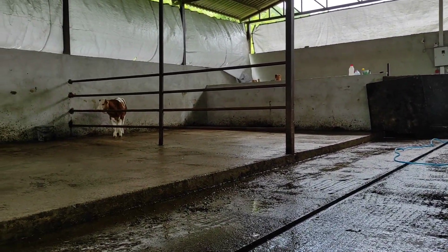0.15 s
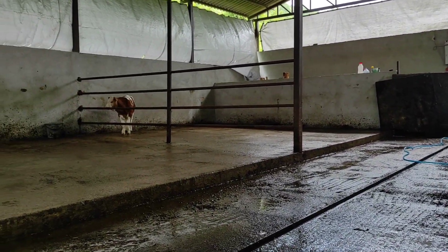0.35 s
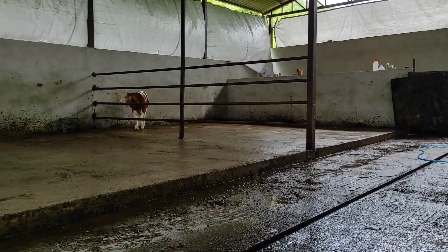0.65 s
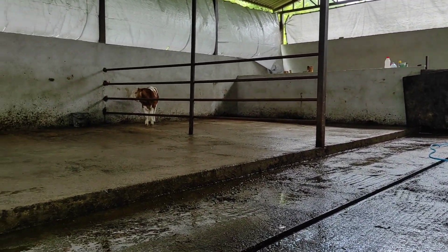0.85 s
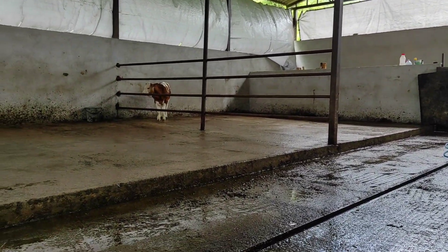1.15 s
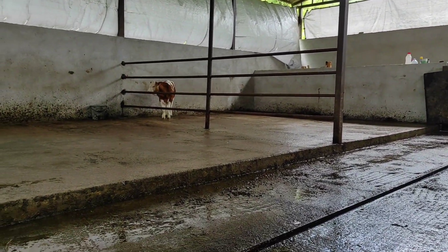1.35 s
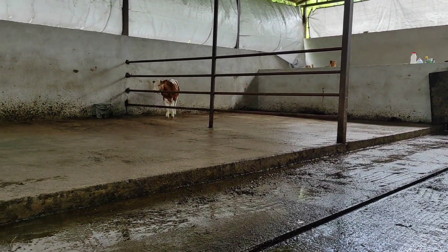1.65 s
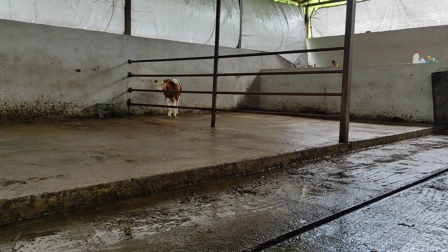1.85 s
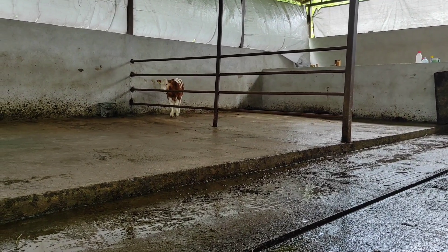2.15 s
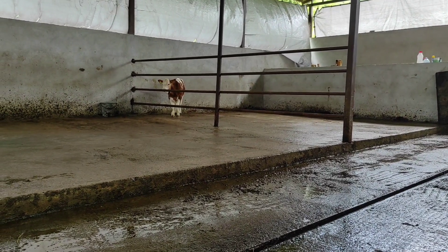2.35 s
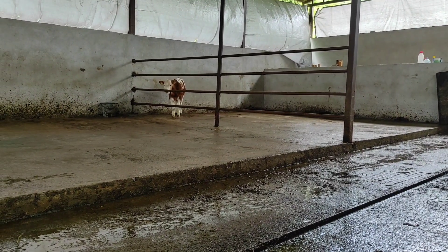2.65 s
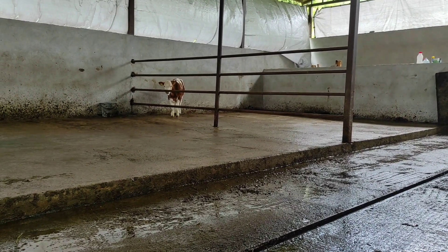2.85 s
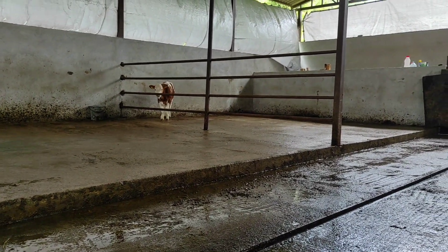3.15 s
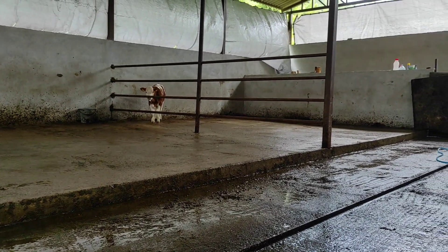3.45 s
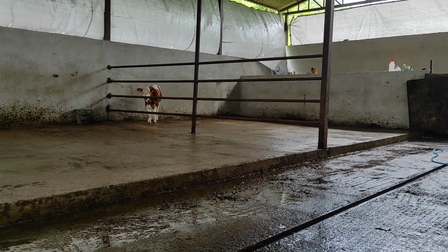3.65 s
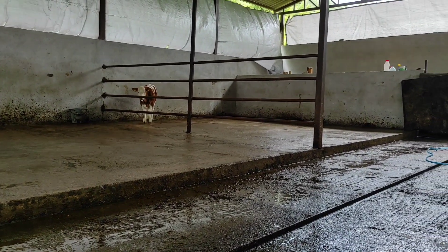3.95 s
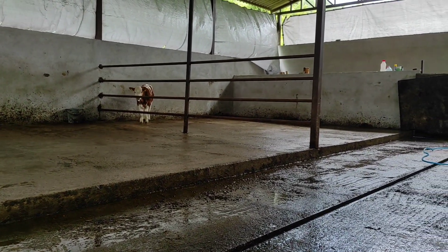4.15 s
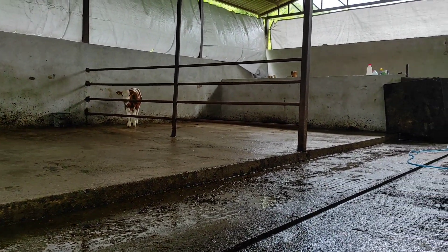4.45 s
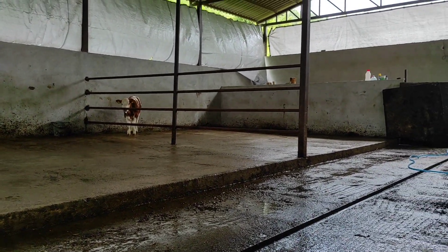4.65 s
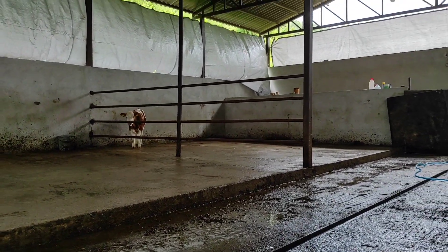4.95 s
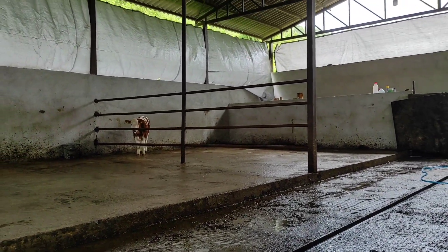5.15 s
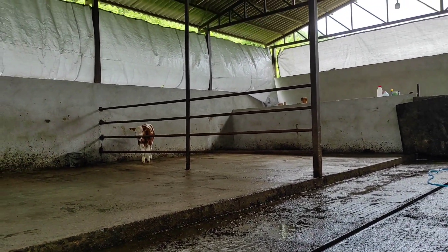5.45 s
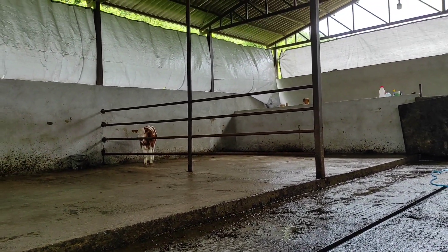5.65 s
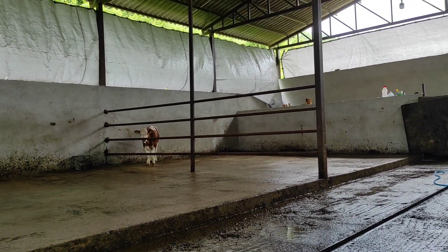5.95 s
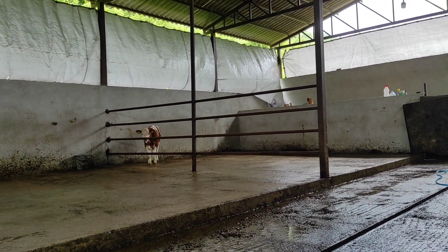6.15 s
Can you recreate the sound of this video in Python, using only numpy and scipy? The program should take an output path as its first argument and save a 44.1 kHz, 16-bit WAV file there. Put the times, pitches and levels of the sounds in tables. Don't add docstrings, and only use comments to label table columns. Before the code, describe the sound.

A steel scraper is pushed in gritty, rasping strokes over wet concrete in an echoing barn, with knocks and a steady hose hiss.

```python
import sys
import numpy as np
from scipy import signal
from scipy.fft import rfft, irfft, next_fast_len
from scipy.io import wavfile
from scipy.ndimage import uniform_filter1d

SR = 44100
rng = np.random.default_rng(int(sys.argv[2]) if len(sys.argv) > 2 else 0)


def unload_audio(sound):
    columns = np.transpose(np.atleast_2d(sound))
    steps = np.round(np.clip(columns, -1, 1) * 32767)
    wavfile.write(sys.argv[1], SR, steps.astype(np.int16))


def gain_from_db(level_db):
    decades = np.asarray(level_db, float) / 20
    return 10 ** decades


N = 277389

# time in seconds, hose hiss in dB, barn murmur in dB.
BACKGROUND_LEVELS = [(0, -53, -48), (.2, -48.5, -49.5), (.3, -42.5, -49.5), (.9, -45, -55.5),
                     (1.749, -45.5, -57), (2.06, -42.5, -47.5), (2.09, -39.5, -53.5), (2.25, -42, -46),
                     (2.53, -38.5, -50), (2.87, -42.5, -49), (3.25, -45, -49), (3.75, -44, -56),
                     (4.25, -42, -62), (4.8, -42, -57), (5.4, -41, -59), (5.948, -42, -59),
                     (6.29, -38.5, -57.5)]
# frequency in Hz, level in dB per Hz.
HOSE_COLOUR = [(590, -42), (1150, -28), (2430, -19), (4810, -14), (7420, 1), (8800, -10), (10700, -17),
               (15200, -26.5)]
# frequency in Hz, level in dB per Hz.
MURMUR_COLOUR = [(53, -50), (90, -19), (157, 1.5), (266, 0.5), (304, -0.5), (364, -1), (909, -6.5),
                 (1130, -5.5), (1600, -16), (2080, -13), (3520, -120)]
# time in seconds, level in dB.
HAND_GRIP = [(0, -76), (.45, -68), (.9, -73), (1.149, -67), (1.5, -72), (2.4, -76), (2.6, -61), (3.35, -59),
             (3.65, -80), (3.78, -59), (4.3, -67.5), (5.5, -65.5), (5.8, -83), (5.9, -75), (6.1, -94),
             (6.29, -82)]
# start in seconds, peak in dB, pitch in Hz, time to fade by 60 dB in seconds.
SCUFFS = [(0.235, -40, 342, 0.082), (0.817, -42, 131, 0.14), (1.588, -45.5, 169.8, 0.15),
          (1.798, -47, 205, 0.13), (2.02, -56, 237, 0.2), (2.177, -53, 268, 0.14), (2.29, -48, 850, 0.2),
          (2.445, -35, 430, 0.19), (2.485, -41, 420, 0.1), (3.187, -39, 124, 0.15), (3.239, -37, 153, 0.12),
          (4.218, -54, 121, 0.13), (5.881, -47, 220, 0.095)]
# pitch in Hz, level in dB, time to fade by 60 dB in seconds.
BLADE_TONES = [(452, -11, 0.066), (618, -5, 0.34), (872.7, -6.5, 0.21), (946, -11, 0.55), (1030, -4.5, 0.3),
               (1270, -8, 0.086), (1490, -10, .1), (1788, -10.5, 0.34), (2020, -8, 0.13)]
# start in seconds, knock peak in dB, then thud, clack and crack in dB above the knock.
RIDGE_KNOCKS = [(0.326, -18, 2, -24, -17), (0.377, -35, -10, 2, -10), (1.029, -35, 1, -16, -18),
                (1.043, -19, -9, -10, -15), (1.156, -19, -7.5, -1.5, -2.5), (2.554, -25, -1.5, -30, -1.5),
                (2.92, -24, 0, -11, -1), (3.015, -14.5, -20, -2.5, -4.5), (3.295, -34, 6, -8, -15),
                (3.309, -37, 2, -1, -12), (3.805, -23, 1.5, -14, -10), (4.292, -30, 4, 2, -16),
                (4.37, -16, 1.5, -20, -21), (4.531, -13.5, -20, -21, -7.5), (4.568, -18, -34, -24, -16),
                (4.857, -23, -10, -8, -14), (4.912, -21.5, -17, -4, 3), (4.998, -12, -11, -25, -9),
                (5.439, -35.5, -12, -11, 12.5), (5.616, -34, -12, -21, -18)]
# time the edge lands in seconds, then light drag, full push
# and easing off, each in seconds, and scrape level in dB.
STROKES = [
    (-.2, 0.085, .13, 0.08, -33),
    (.323, .12, 0.22, 0.071, -30.5),
    (1.019, .138, .19, 0.063, -29.5),
    (2.553, 0.049, 0.073, 0.12, -30),
    (2.914, 0.039, .13, 0.062, -31.5),
    (3.29, 0.08, .18, 0.047, -28.5),
    (3.79, .083, 0.15, 0.093, -30),
    (4.289, 0.084, 0.22, .065, -27.5),
    (4.847, .067, 0.2, 0.078, -25.5),
    (5.437, 0.096, 0.18, 0.07, -31),
]
# slab rumble, rasp and grit spray in dB above the scrape.
LANES = [(0, -5, 0.5), (2.5, -6, -6), (3, -7, -5.5), (2, -5.5, -0.5), (1.5, -5, -3), (0.5, -9.5, -6),
         (1, -9, -8.5), (-4, -7.5, -7.5), (-1, -8, -5.5), (3.5, -8.5, -6)]
# time in seconds, change in dB, width in seconds.
PATCHES = [(.38, 3, .02), (.525, 4.5, 0.023), (.62, -2.5, 0.017), (1.19, 3.5, 0.033), (1.115, 3, .015),
           (2.57, 4, .008), (2.62, -0.5, 0.0061), (3.022, 6.5, 0.014), (3.39, 2.5, 0.013), (3.54, 3, .025),
           (3.79, -6, .008), (3.97, 3, 0.05), (4.385, 2, 0.017), (4.47, -3.5, 0.012), (4.53, 1, .02),
           (4.585, 2.5, .02), (4.862, 1, .012), (5.08, 0, 0.032), (5.46, -2.5, 0.023), (5.625, 1, .015)]
# frequency in Hz, level in dB per Hz.
SCRAPE_COLOUR = [(59, -58.5), (100, -32), (141, -9), (358, -3), (520, 3), (730, -2), (960, 2.5),
                 (1330, -5.5), (1740, -8), (4610, -20.5), (7280, -11), (8640, -17.5), (9500, -34.5),
                 (12400, -45), (20900, -120)]
# frequency in Hz, level in dB, time to fade by 60 dB in seconds.
WALLS = [(173, -7.5, 1), (384, 2, 0.68), (907, 2, 0.69), (2300, 4.5, 0.67), (5470, 6, 0.74)]
# frequency in Hz, left minus right in dB.
LEFT_LEAD = [(40, -3), (200, 2.5), (400, 2), (700, 4), (2000, 0.5), (4000, -2), (8000, 0.5), (14000, 23.5)]
# frequency in Hz, level in dB.
MIC_COLOUR = [(120, 0.5), (9200, 1), (9600, -8), (10300, -5.5), (15000, -3.5)]


def unit(x):
    return x / np.sqrt(np.mean(x ** 2))


def read(points, hz):
    f, db = np.transpose(points)
    return np.interp(np.log(hz + 1), np.log(f), db)


def colour(x, points):
    cepstrum = irfft(np.log(gain_from_db(read(points, np.fft.rfftfreq(4096, 1 / SR)))))
    cepstrum[1:2048] *= 2
    cepstrum[2049:] = 0
    response = irfft(np.exp(rfft(cepstrum)))[:2048]
    return signal.oaconvolve(x, response)[:len(x)]


def band(x, lo_hz, hi_hz):
    return signal.sosfilt(signal.butter(3, [lo_hz, hi_hz], "band", fs=SR, output="sos"), x)


def split(x, edges_hz):
    size = 2 ** 19
    log_hz = np.log(np.fft.rfftfreq(size, 1 / SR) + 1)
    spectrum = rfft(x, size)
    below = [np.clip(.5 + (np.log(edge) - log_hz) / .5, 0, 1) for edge in edges_hz]
    shares = np.diff([0 * log_hz, *below, 1 + 0 * log_hz], axis=0)
    return [irfft(spectrum * share)[:N] for share in shares]


def walk(rate_hz):
    step = int(SR / rate_hz)
    held = rng.standard_normal(N)[np.arange(N) // step]
    return unit(uniform_filter1d(uniform_filter1d(held, step), step))


def background(spatter_db=0.64, flicker_db=1.0, splash_db=1.6, swell_db=2.0, hose_gain_db=1.0,
               murmur_gain_db=-4.5, hose_pan_db=-2, murmur_pan_db=3.8):
    s, *columns = np.transpose(BACKGROUND_LEVELS)
    hose_db, murmur_db = (np.interp(np.arange(N) / SR, s, c) for c in columns)
    hose_db = hose_db + hose_gain_db + spatter_db * walk(26)
    murmur_db = murmur_db + murmur_gain_db + swell_db * walk(8.1)
    alike = 0.5 * rng.standard_normal(N)
    splash_gain = gain_from_db(splash_db * walk(9))
    out = []
    for side in (.5, -.5):
        flicker = gain_from_db(flicker_db * walk(130))
        hose = unit(colour(rng.standard_normal(N) * flicker, HOSE_COLOUR))
        splash, jet = split(hose, (5000,))
        hose = splash * splash_gain + jet
        murmur = unit(colour(rng.standard_normal(N) + alike, MURMUR_COLOUR))
        out.append(gain_from_db(hose_db + side * hose_pan_db) * hose + gain_from_db(murmur_db + side * murmur_pan_db) * murmur)
    return np.array(out)


def handling(waver_db=3.8):
    db = np.interp(np.arange(N) / SR, *np.transpose(HAND_GRIP))
    ports = []
    for lead_db in (4.5, -1.5):
        level = gain_from_db(db + lead_db + waver_db * walk(16))
        ports.append(level * unit(band(rng.standard_normal(N), 8.2, 108.0)))
    return np.array(ports)


def scuffs(gain_db=-6.0, attack_s=0.0034):
    t = np.arange(SR // 5) / SR
    out = np.zeros((2, N + SR))
    for (s, db, hz, t60), puff in zip(SCUFFS, rng.standard_normal((len(SCUFFS), 3, len(t)))):
        shape = 1000. ** (-t / t60) * np.minimum(t / attack_s, 1)
        rub = unit(band(puff[:2] + puff[2], hz / 1.32, hz * 1.39))
        start = int(s * SR)
        out[:, start:start + len(t)] += gain_from_db(db + gain_db) * rub * shape
    return out[:, :N]


def blade(x):
    t = np.arange(SR // 2) / SR
    ring = sum(gain_from_db(db) * np.sin(2 * np.pi * hz * t) * 1000. ** (-t / t60) for hz, db, t60 in BLADE_TONES)
    return signal.oaconvolve(x, ring / np.sqrt(np.sum(ring ** 2)))[:N]


def knocks(thud_db=0.5, knock_db=7.5, clack_db=2.5, crack_db=5.0, ring_db=-3.0, push_s=0.0014):
    t = np.arange(SR // 20) / SR
    push = t / push_s * np.exp(1 - t / push_s)
    blows = np.zeros((4, N + len(t)))
    for (s, db, *above_db), grit in zip(RIDGE_KNOCKS, rng.standard_normal((len(RIDGE_KNOCKS), len(t)))):
        peaks = gain_from_db(db + np.array([0, *above_db]))
        start = int(s * SR)
        blows[:, start:start + len(t)] += peaks[:, None] * np.sign(grit) * push
    knock, thud, clack, crack = blows[:, :N]
    low = gain_from_db(thud_db + 19.5) * band(thud, 190, 428)
    low += gain_from_db(knock_db + 4) * band(knock, 436, 1130)
    high = gain_from_db(clack_db + 18.5) * band(clack, 1540, 2130)
    high += gain_from_db(crack_db + 6.5) * (band(crack, 5870, 8960) + 0.03 * crack)
    return low + high + gain_from_db(ring_db) * blade(knock + clack)


def pressure(release_s, land_s=.004, bite_s=.014, drag_db=-7, sag_db_per_s=-7.5, ease_db=-13.5,
             drag_slab_db=-2, ease_grit_db=-9, slab_fall_db=-14, rasp_rise_db=1.5, grit_rise_db=0.5):
    t = np.arange(N) / SR
    gains = np.zeros((4, N))
    patch_db = sum(db * np.exp(-.5 * ((t - s) / width) ** 2) for s, db, width in PATCHES)
    for (land, drag, push, ease, db), (slab_db, rasp_db, grit_db) in zip(STROKES, LANES):
        bite = land + drag
        lift = bite + push + ease
        light = np.clip((bite - t) / bite_s, 0, 1)
        easing = np.clip(1 - (lift - t) / ease, 0, 1)
        way = np.clip((t - land) / (lift - land), 0, 1)
        level_db = db + patch_db + drag_db * light
        level_db += sag_db_per_s * np.clip(t - bite, 0, push) + ease_db * easing
        landed = np.clip((t - land) / land_s, 0, 1)
        lifted = gain_from_db(-60 * np.clip(t - lift, 0, 1) / release_s)
        slab = level_db + slab_db + slab_fall_db * way + drag_slab_db * light
        rasp = level_db + rasp_db + rasp_rise_db * way
        grit = level_db + grit_db + grit_rise_db * way + ease_grit_db * easing
        gains += lifted * landed * gain_from_db([level_db, slab, rasp, grit])
    return gains


def strokes(ticks_per_s=4000., scatter_db=3., judder_db=1.36, ring_db=-11.5, release_s=0.16):
    gains = pressure(release_s)
    when, size, sign = rng.random(N), rng.exponential(size=N), rng.standard_normal(N)
    ticks = (when < ticks_per_s / SR) * gain_from_db(scatter_db * np.minimum(size, 4)) * np.sign(sign)
    rub = 0.36 * rng.standard_normal(N)
    ticks = unit((unit(ticks) + rub) * gain_from_db(judder_db * walk(60)))
    sound = colour(ticks, SCRAPE_COLOUR + [(14000, -63)])
    slab, scrape, rasp, grit = map(unit, split(sound, (450, 1300, 4000)))
    steel = gain_from_db(ring_db) * blade(gains[0] * ticks)
    trims = gain_from_db([[-1.5], [-1.2], [.3], [-1.3]])
    return np.sum(gains * [scrape, slab, rasp, grit] * trims, axis=0) + steel


def barn(x, direct_db=-10.5, early_s=0.005, tail_db=-6.0, move_s=.03, even_hz=59.4, count=5):
    t = np.arange(int(.7 * SR)) / SR
    size = next_fast_len(N + SR)
    out = 0
    place = np.arange(N) / SR / move_s % count
    for k in range(count):
        away = np.minimum(abs(place - k), count - abs(place - k))
        here = x * np.cos(np.pi / 2 * np.minimum(away, 1))
        shared, *own = rng.standard_normal((3, len(t)))
        noise = own + 0.92 * band(shared, 64, 407)
        tail = noise * 1000. ** (-t / .3)
        for hz, db, t60 in WALLS:
            tail += gain_from_db(db) * band(noise, hz / 1.763, hz * 1.95) * 1000. ** (-t / t60)
        early = unit(noise * np.exp(-t / early_s))
        echo = rfft(early + gain_from_db(tail_db) * unit(tail))
        power = uniform_filter1d(abs(echo) ** 2, int(even_hz * t[-1]))
        echo = irfft(echo / np.sqrt(power))[:, :len(t) * 7 // 8]
        echo[(0, 1), (2 + k, 0)] += gain_from_db(direct_db)
        out = out + rfft(here, size) * rfft(echo, size)
    return irfft(out, size)[:, :N]


def scene():
    hits = knocks()
    room = barn(strokes() + gain_from_db(-9.0) * hits)
    near = band(room + gain_from_db(-14.0) * hits, 156.5, 22000) + scuffs()
    heard = [colour(near[port], [(hz, (.5 - port) * db) for hz, db in LEFT_LEAD]) for port in range(2)]
    return gain_from_db(0.5) * np.array(heard) + background() + handling()


def low_pass(x):
    return signal.sosfilt(signal.butter(12, 15840, fs=SR, output="sos"), x)


def record(dry):
    top_cut = signal.ellip(8, .2, 60, 15350, fs=SR, output="sos")
    mix = signal.sosfilt(top_cut, [colour(port, MIC_COLOUR) for port in dry])
    return low_pass(mix)


dry = scene()
out = record(dry)
unload_audio(out)
```